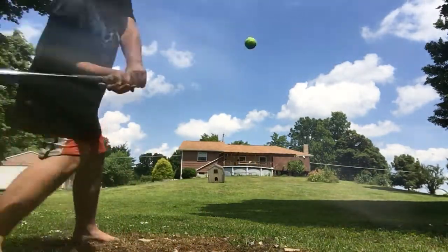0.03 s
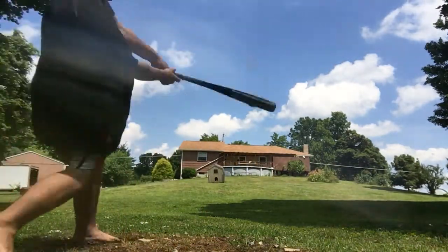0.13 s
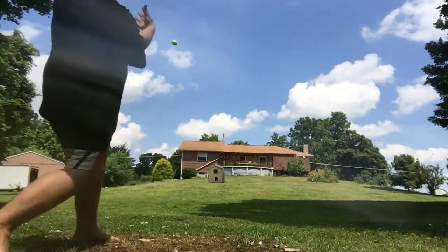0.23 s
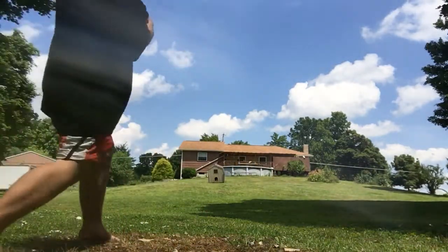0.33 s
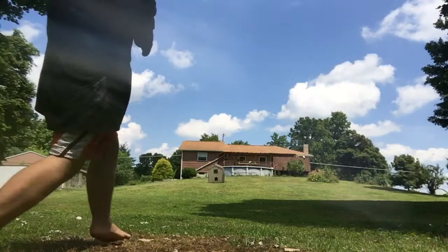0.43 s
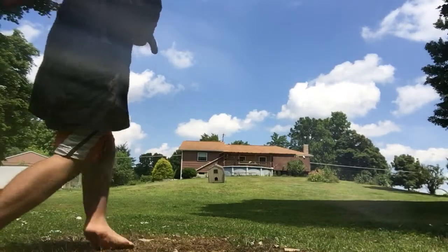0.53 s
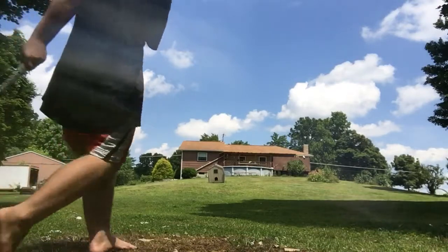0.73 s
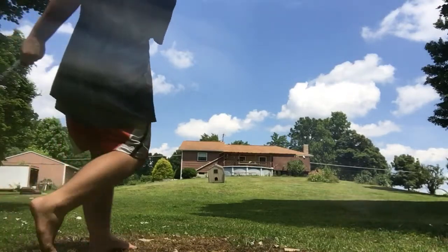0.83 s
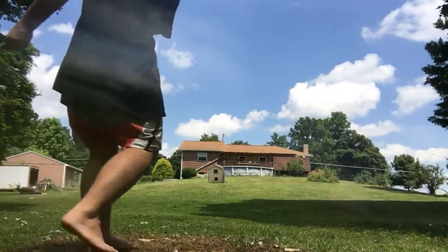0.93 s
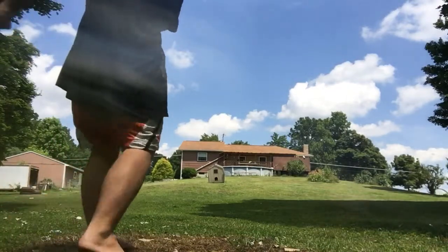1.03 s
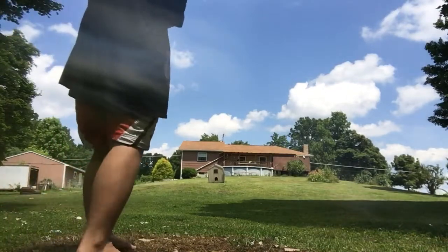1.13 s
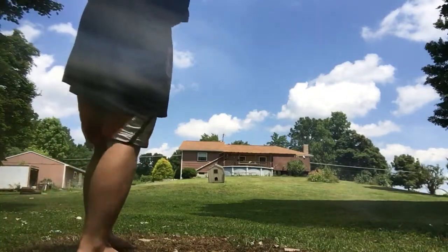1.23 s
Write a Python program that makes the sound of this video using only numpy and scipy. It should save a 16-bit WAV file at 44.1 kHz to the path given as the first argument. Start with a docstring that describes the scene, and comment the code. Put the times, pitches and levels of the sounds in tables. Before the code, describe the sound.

One sharp crack of a metal bat hitting a tennis ball on a quiet lawn.

```python
"""Quiet air over a lawn, with faint distant chirps. A metal bat swishes past a phone lying in the grass,
buffets it with wind and strikes a tennis ball: a crack, a fizz of felt, a short ring of the barrel and
the hollow pop of the ball. Trees scatter the hit back. The batter's bare feet thud and scuff and clothes
rustle through the follow-through; a thin insect trill and a few more chirps close the scene."""
import sys
import numpy as np
from scipy import signal
from scipy.fft import rfft, irfft
from scipy.io import wavfile

SR = 44100
rng = np.random.default_rng(int(sys.argv[2]) if len(sys.argv) > 2 else 0)


def file_out(sig):
    """Save sig as 16-bit WAV at sys.argv[1]."""
    # one column per channel
    cols = np.atleast_2d(sig).T
    # limit, then scale
    lim = np.clip(cols, -1, 1)
    pcm = np.round(lim * 32767).astype(np.int16)
    wavfile.write(sys.argv[1], SR, pcm)


N = 57330
T = np.arange(N) / SR
HIT_S = .232


def bat():
    """The contact cracks, the felt fizzes on the barrel and the barrel's damped modes ring."""
    # barrel modes (frequency [Hz], relative level [dB], t60 [s])
    modes = [(575, -15, 0.043), (735, -25, 0.031), (839.4, -29.5, 0.039), (972, -31, 0.029),
             (1186.5, -21.5, 0.052), (1299, -19.5, 0.052), (1410, -20, 0.047), (1570, -20.5, 0.027),
             (1815, -5.5, 0.018), (1940, -22.5, 0.072), (2284.4, -16, 0.011), (3616, -13.5, 0.02),
             (5400, -26.5, .02), (6000, -14, 0.013), (7182, -21, .024), (9770, -26.5, .014)]
    # spectrum of the contact crack (frequency [Hz], relative level [dB])
    crack_eq = [(100, -7), (400, 3.5), (1000, -6.5), (2200, 2), (3000, -10.5), (4200, -14), (6500, -10.5),
                (9000, -16.5), (15000, -11.5)]
    # spectrum of felt scraping the barrel (frequency [Hz], relative level [dB])
    fizz_eq = [(200, 0), (900, 3), (2500, -2), (4200, -10), (6500, -8), (9000, -17), (15000, -22)]
    # spectrum of the fizz's brief bright edge (frequency [Hz], relative level [dB])
    sizzle_eq = [(500, -12), (2200, 4), (4200, -6.5), (8000, -4), (15000, -2.5)]
    age = T - HIT_S
    crack = undb(-2.5) * np.roll(snap(crack_eq), int(HIT_S * SR))
    fizz = undb(-12.5) * noise(fizz_eq) * fade(age, t60=.021)
    sizzle = undb(-17.5) * noise(sizzle_eq) * fade(age, t60=.005)
    ring = sum(undb(db) * damped_tone(age - .0002, hz, t60) for hz, db, t60 in modes)
    return crack + fizz + sizzle - undb(-2) * ring


def ball():
    """The ball squashes and springs back: a pop falling in pitch, a weak ring and a low push of air."""
    start_hz, sag_hz_per_s, rise_s = 303, 6100, .0027
    age = np.maximum(T - HIT_S - .0011, 0)
    rise = age / rise_s
    squash = (rise * np.exp(1 - rise)) ** 2.8  # peaks at rise_s
    envelope = undb(-2.5) * squash + undb(-27.5) * fade(age, t60=.062)
    pop = envelope * np.sin(2 * np.pi * (start_hz - sag_hz_per_s * age / 2) * age)
    push = undb(-18.5) * damped_tone(T - HIT_S - .0037, hz=148.1, t60=.02)
    return pop + push


def turf(direct, lag_s=.0092, top_hz=1438):
    """The ground reflects a dull copy just behind the direct sound."""
    dull = signal.sosfilt(signal.butter(4, top_hz, fs=SR, output="sos"), direct)
    return undb(-14.5) * np.interp(T - lag_s, T, dull)


def trees(hit, lag_s=.029, rise_s=.022):
    """Foliage scatters the crack into a hiss, near then far, that keeps a little of the bat's ring."""
    # spectrum of the echo off the trees (frequency [Hz], relative level [dB])
    echo_eq = [(30, -25.5), (120, 0.5), (280, 14.5), (400, 9), (600, -6), (900, 0), (1300, 2), (2000, 0.5),
               (3000, -2), (4200, -5), (7000, -7), (9000, -18), (15000, -19.5)]
    age = T - HIT_S - lag_s
    near = undb(-37) * fade(age, t60=.16)
    far = undb(-52) * fade(age, t60=1.1)
    tail = np.clip(age / rise_s, 0, 1) * (near + far)
    response = rng.standard_normal(N) * np.interp(T + HIT_S, T, tail)  # the tail, timed from the hit
    ring = signal.fftconvolve(hit, response / np.linalg.norm(response))[:N]
    return noise(echo_eq) * tail + undb(-39) * ring


def swing(peak_s=.19):
    """Bat and sleeves swish, the barrel whistles at top speed, and the wind buffets the microphone."""
    # spectrum of the swish (frequency [Hz], relative level [dB])
    swish_eq = [(30, -8.5), (100, 3), (300, 7.5), (550, -3.5), (1500, 2), (3000, -5), (7000, -14),
                (10000, -20), (15000, -20.5)]
    # spectrum of wind on the microphone (frequency [Hz], relative level [dB])
    wind_eq = [(20, -30), (45, -7), (64, 3), (85, -2), (120, -10), (250, -18), (500, -32), (1500, -42),
               (6000, -68.5)]
    # gusts from the swing (time [s], half length [s], level [dB])
    gusts = [(.197, .014, -35), (.24, 0.019, -39), (.311, .011, -45)]
    arc = np.maximum(fade(peak_s - T, t60=.19), fade(T - peak_s, t60=.7))  # fast in, slow out
    swish = undb(-50) * noise(swish_eq) * arc
    whistle = undb(-40.5) * buzz(hz=1600, width_hz=450) * swell(at=.226, half=.006)
    return swish + whistle + noise(wind_eq) * swells(gusts)


def rustle(grain_db=2):
    """The batter's clothes rub and feet brush the grass in grainy swells."""
    # spectrum of rubbing cloth (frequency [Hz], relative level [dB])
    cloth_eq = [(30, -14.5), (150, 0), (500, 0), (1300, 1), (2500, -0.5), (5000, -5), (7000, -9.5),
                (9000, -13), (15000, -18)]
    # cloth moves (time [s], half length [s], level [dB])
    moves = [(.45, 0.074, -65), (.515, 0.028, -65.5), (.595, 0.021, -61), (.63, 0.0083, -64)]
    # spectrum of crisp grass (frequency [Hz], relative level [dB])
    grass_eq = [(30, -25), (400, 0), (1300, 6.5), (2500, -1), (5000, -4), (9000, -8.5), (15000, -7)]
    # foot scuffs (time [s], half length [s], level [dB])
    scuffs = [(.05, 0.04, -67), (.598, 0.0096, -62), (.885, 0.021, -66), (.943, 0.0066, -72.5),
              (1.078, 0.0085, -62.5), (1.17, 0.12, -78.5)]
    grain = undb(grain_db * noise([(1, 0), (150, 0), (600, -40), (2000, -80)]))  # fast level flicker
    return grain * (noise(cloth_eq) * swells(moves) + noise(grass_eq) * swells(scuffs))


def footfalls(rise_s=.0075):
    """Bare feet thud on the turf: low damped tones with a soft attack."""
    # thuds (time [s], frequency [Hz], level [dB])
    steps = [(0.267, 257.5, -35), (0.307, 200, -44.5), (.495, 190, -44.5)]
    return sum(undb(db) * np.clip((T - at) / rise_s, 0, 1) * damped_tone(T - at, hz, t60=.061)
               for at, hz, db in steps)


def birds():
    """Far-off birds give short buzzy chirps."""
    # chirps (time [s], half length [s], frequency [Hz], width [Hz], level [dB])
    chirps = [(0.041, 0.055, 3550, 160, -72.5), (0.091, 0.014, 3490, 159, -67),
              (0.143, 0.013, 3560, 160, -66.5), (1.03, 0.022, 3840, 416, -66.5),
              (1.117, .05, 3776, 700, -74.5), (1.143, 0.12, 3040, 300, -80.5)]
    return sum(undb(db) * swell(at, half) * buzz(hz, width) for at, half, hz, width, db in chirps)


def insect():
    """One thin trill swells and fades."""
    return undb(-83) * buzz(hz=5410, width_hz=220) * swell(at=.8, half=.17)


def air():
    """Outdoor air lays a steady bed of soft rumble and faint hiss."""
    # spectrum of the open air (frequency [Hz], relative level [dB])
    air_eq = [(15, -23.5), (30, -2.5), (62, 0.5), (130, -4.5), (220, -9), (320, -9.5), (480, -18.5),
              (1000, -20.5), (1600, -24.5), (3000, -27), (5500, -29.5), (8000, -37.5), (16000, -43.5)]
    return undb(-63) * noise(air_eq)


def undb(db):
    """Decibels to gain."""
    return 10 ** (np.asarray(db) / 20)


def spectrum(points):
    """Gain per FFT bin through (frequency [Hz], level [dB]) points."""
    hz, db = np.array(points, float).T
    bin_hz = np.maximum(np.fft.rfftfreq(N, 1 / SR), 1)
    return undb(np.interp(np.log(bin_hz), np.log(hz), db))


def noise(points):
    """Noise of rms 1, coloured by the spectrum points."""
    coloured = irfft(rfft(rng.standard_normal(N)) * spectrum(points), N)
    return coloured / coloured.std()


def snap(points):
    """One sharp minimum-phase pulse of peak 1, coloured by the spectrum points."""
    cepstrum = irfft(np.log(spectrum(points)), N)
    causal = 2 * cepstrum * (T > 0) * (T < T[-1] / 2)
    pulse = irfft(np.exp(rfft(causal)), N)
    return pulse / np.abs(pulse).max()


def buzz(hz, width_hz):
    """A fluttering tone of rms 1."""
    flutter = noise([(1, 0), (width_hz / 2, 0), (width_hz * 2, -40), (width_hz * 10, -80)])
    return flutter * np.sqrt(2) * np.sin(2 * np.pi * hz * T)


def fade(age, t60):
    """Silent before age 0, then falling 60 dB every t60 seconds."""
    return (age >= 0) * np.exp(-np.log(1000) * np.maximum(age, 0) / t60)


def damped_tone(age, hz, t60):
    """A sine that starts at age 0 and dies away."""
    return fade(age, t60) * np.sin(2 * np.pi * hz * age)


def swell(at, half):
    """A bell-shaped rise and fall; centre and half length in seconds."""
    return np.exp(-((T - at) / half) ** 2 / 2)


def swells(rows):
    """An envelope of swells from (time [s], half length [s], level [dB]) rows."""
    return sum(undb(db) * swell(at, half) for at, half, db in rows)


def scene():
    """The hit and its echo among the quiet sounds of the lawn, in mono."""
    strike = bat()
    hit = strike + turf(strike) + ball()
    return (hit + trees(hit) + swing() + rustle() + footfalls() + birds() + insect() + air())[None]


def record(dry, low_cut_hz=45, top_hz=16100):
    """The phone thins the deepest bass, clips at full scale and cuts the top."""
    thin = signal.sosfilt(signal.butter(2, low_cut_hz, "high", fs=SR, output="sos"), dry)
    clipped = np.clip(thin, -1, 1)
    return signal.sosfilt(signal.ellip(10, .2, 80, top_hz, fs=SR, output="sos"), clipped)


dry = scene()
out = record(dry)
file_out(out)
```